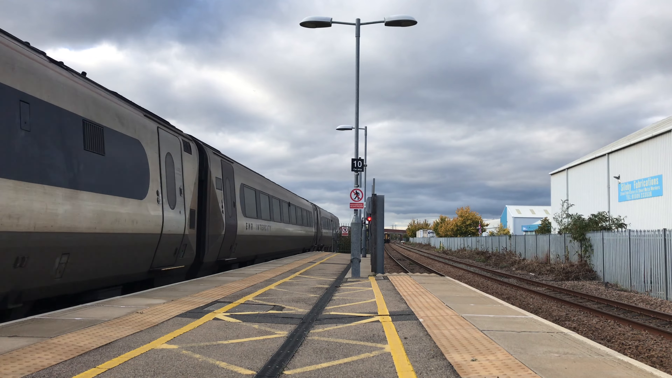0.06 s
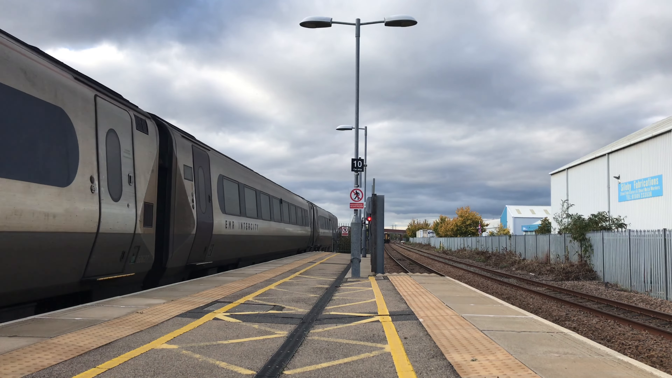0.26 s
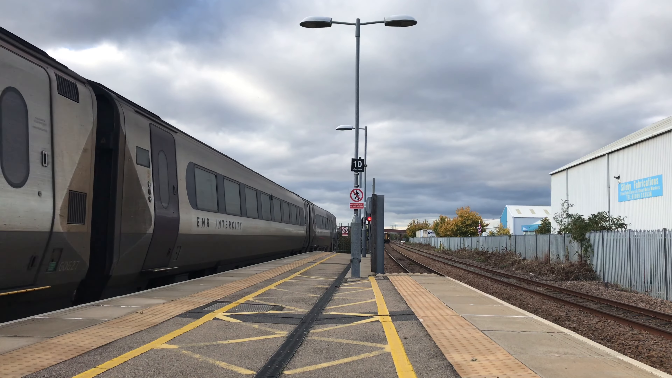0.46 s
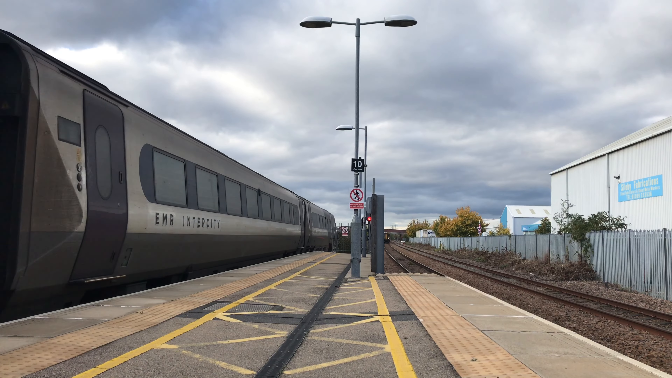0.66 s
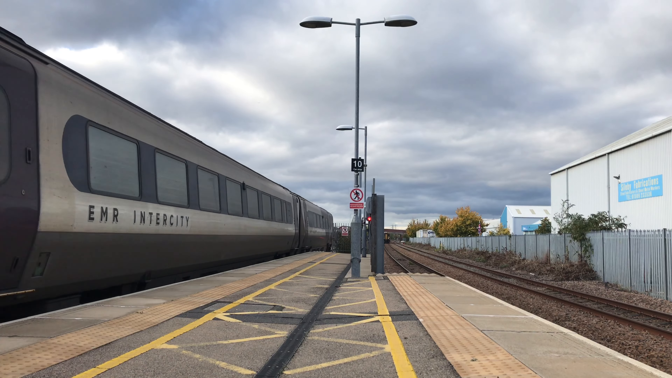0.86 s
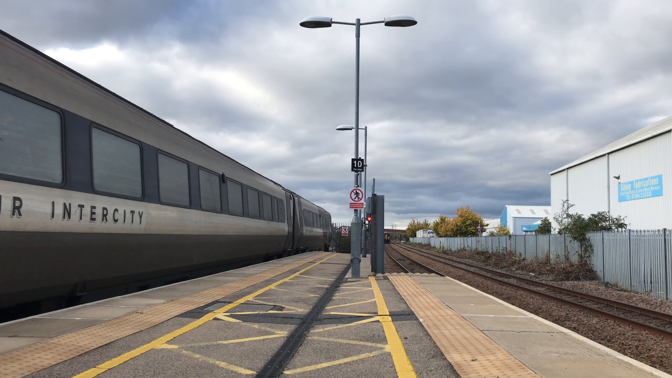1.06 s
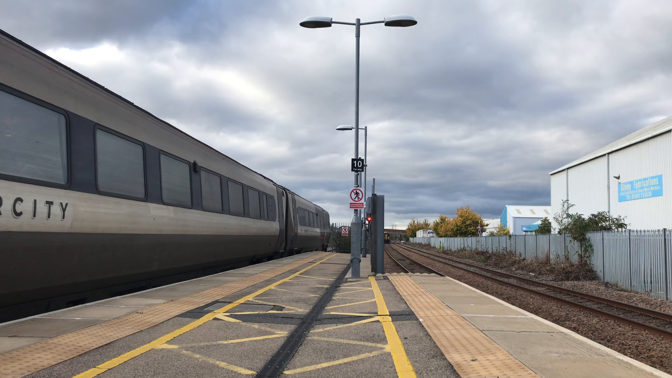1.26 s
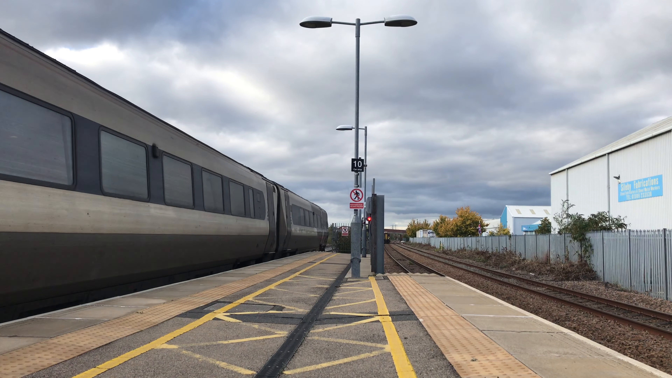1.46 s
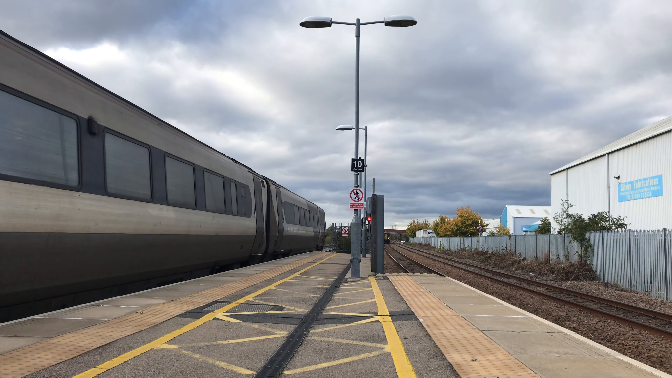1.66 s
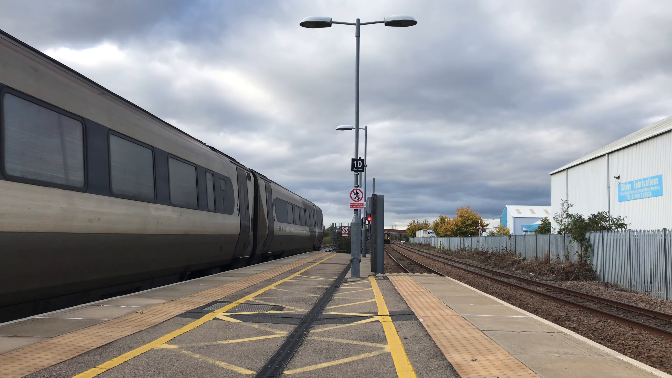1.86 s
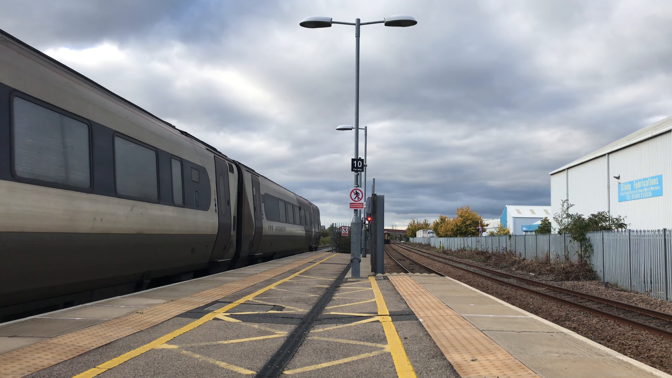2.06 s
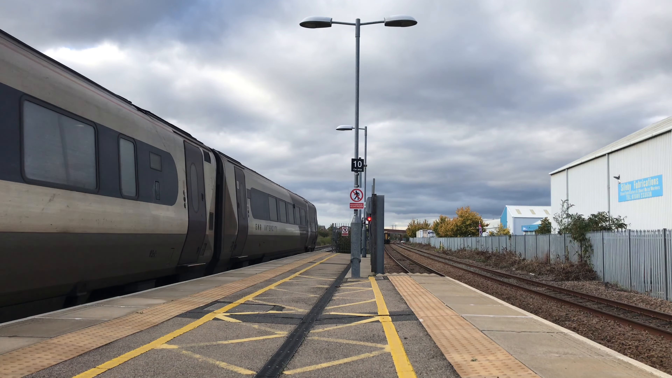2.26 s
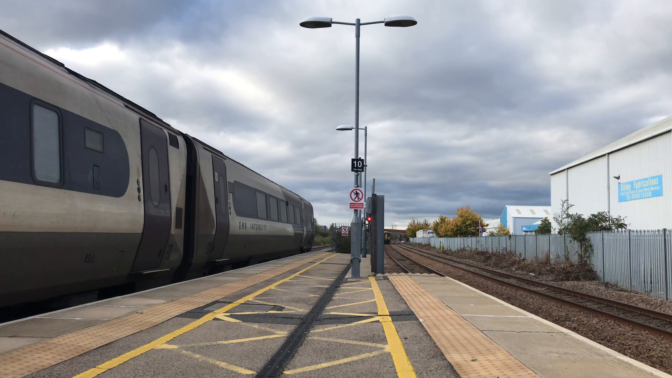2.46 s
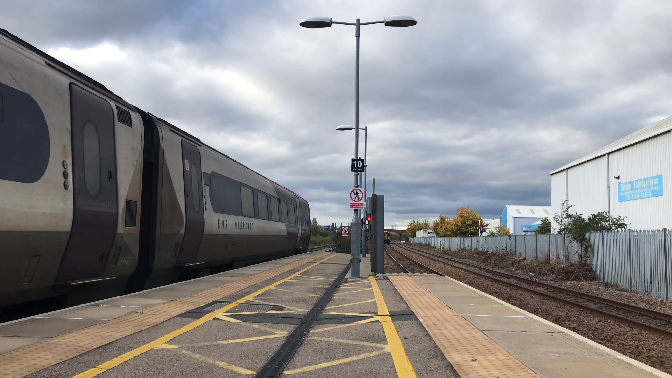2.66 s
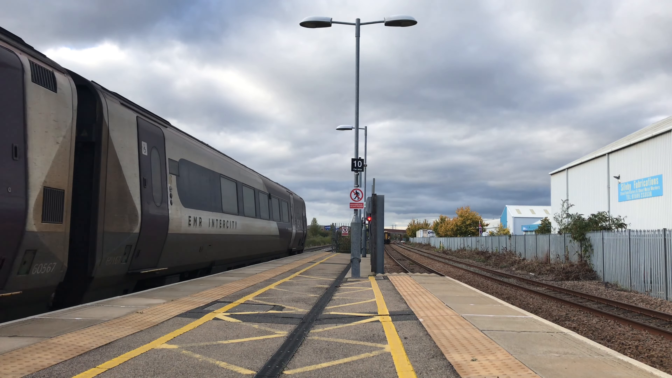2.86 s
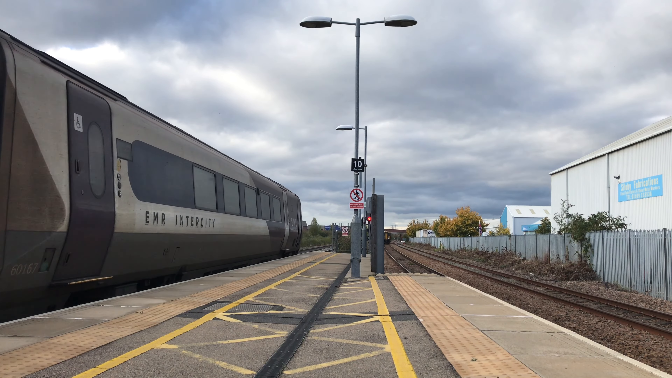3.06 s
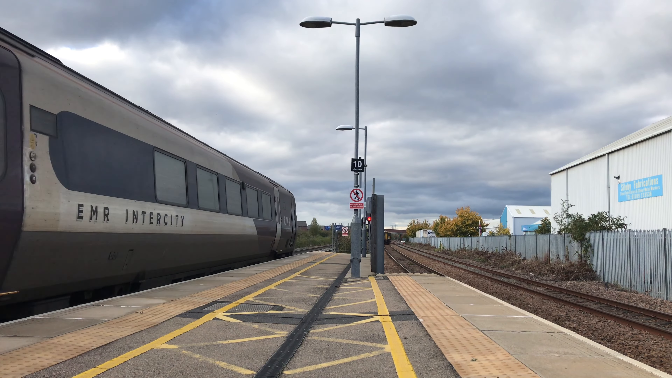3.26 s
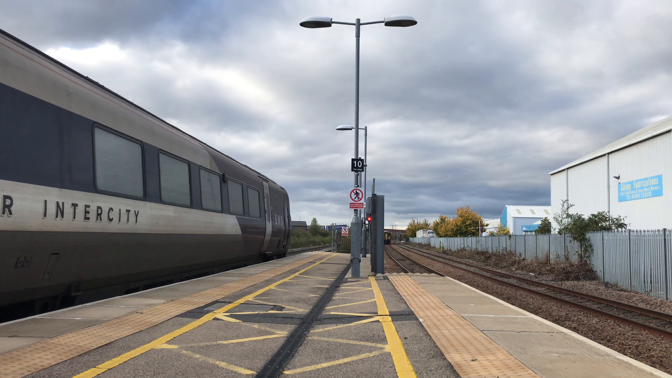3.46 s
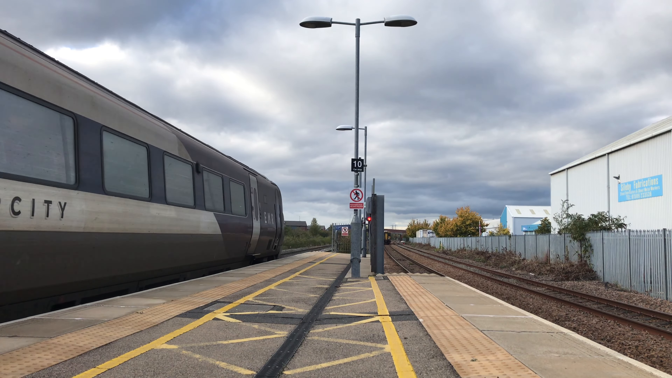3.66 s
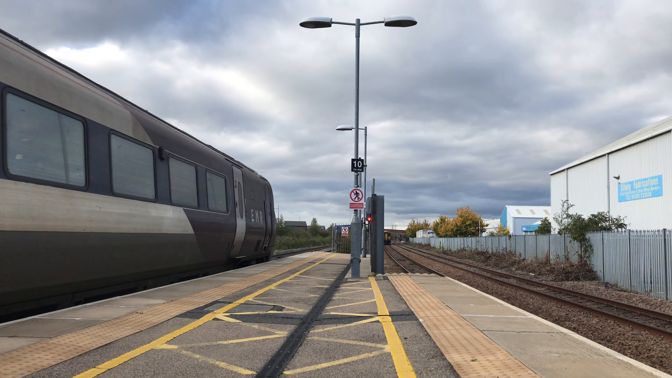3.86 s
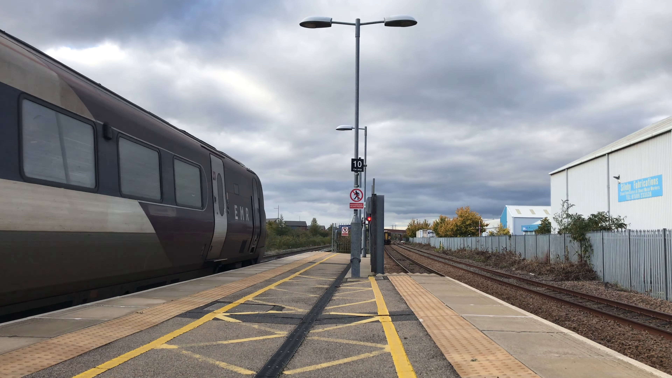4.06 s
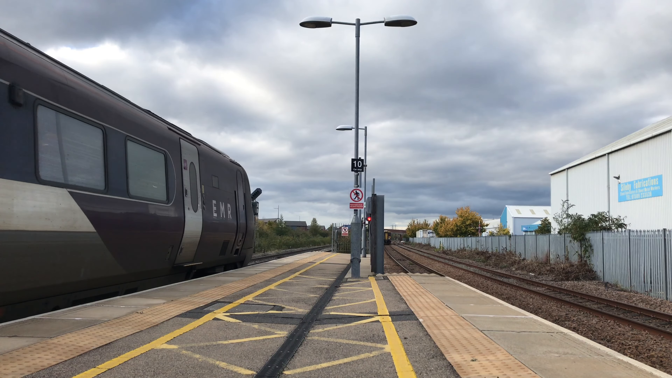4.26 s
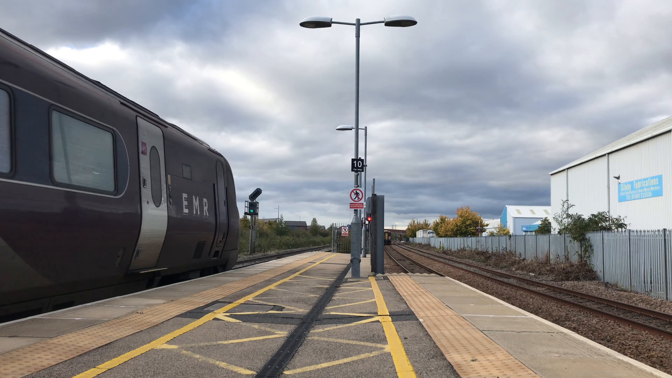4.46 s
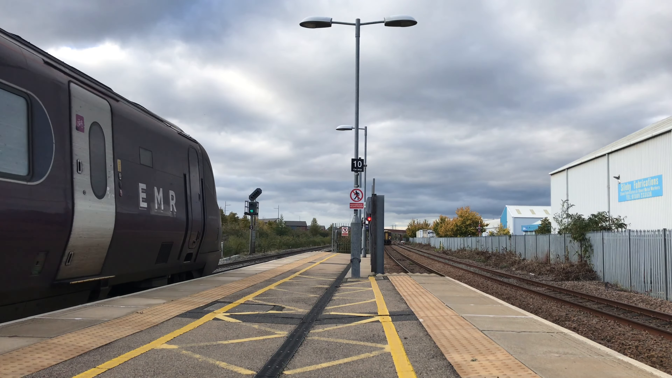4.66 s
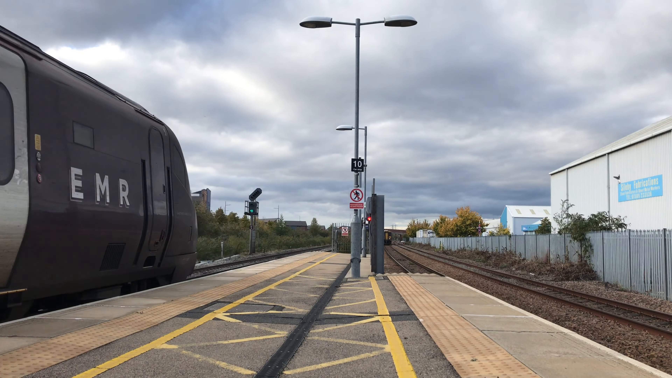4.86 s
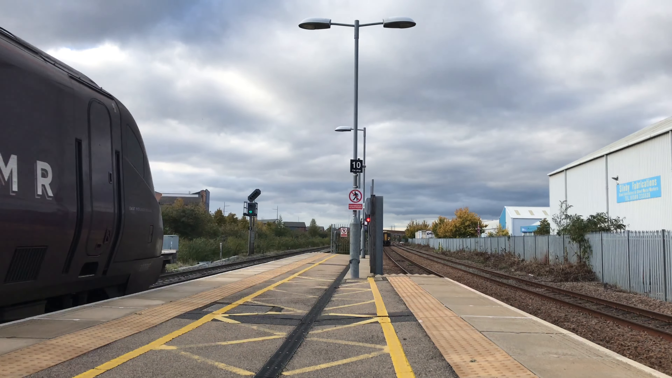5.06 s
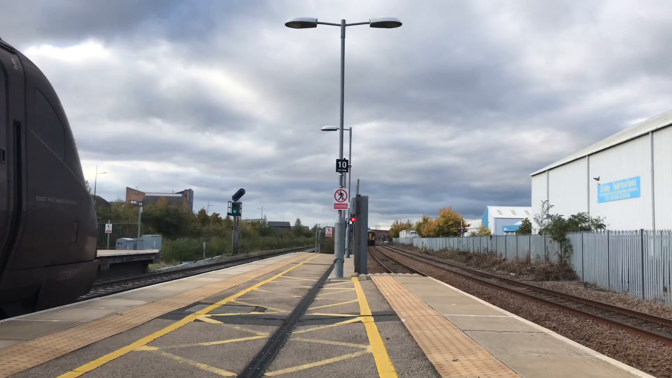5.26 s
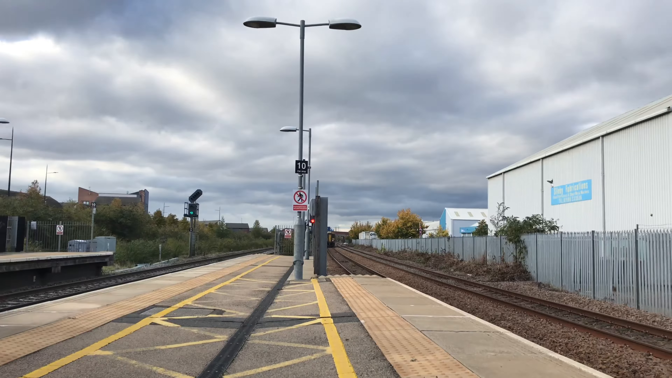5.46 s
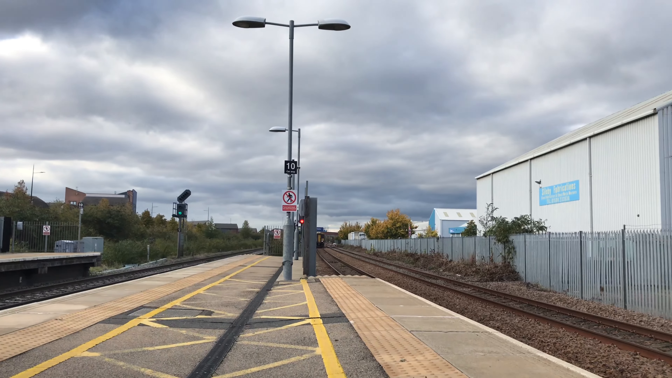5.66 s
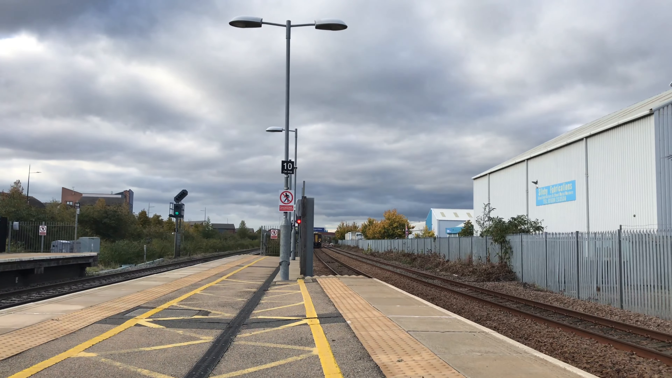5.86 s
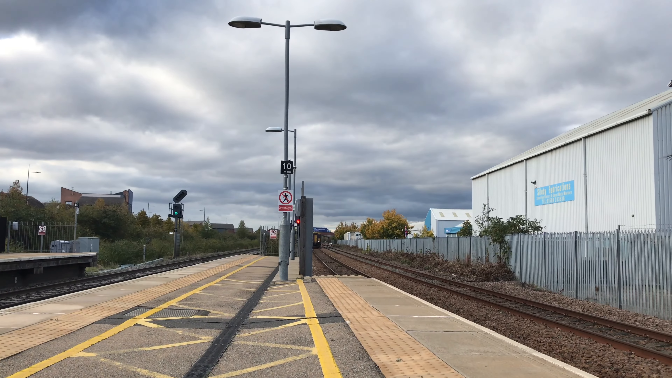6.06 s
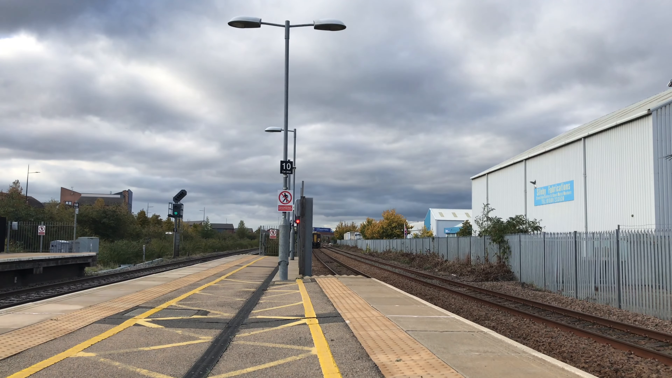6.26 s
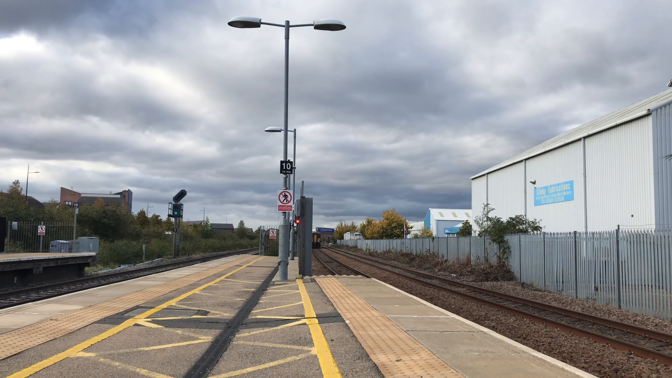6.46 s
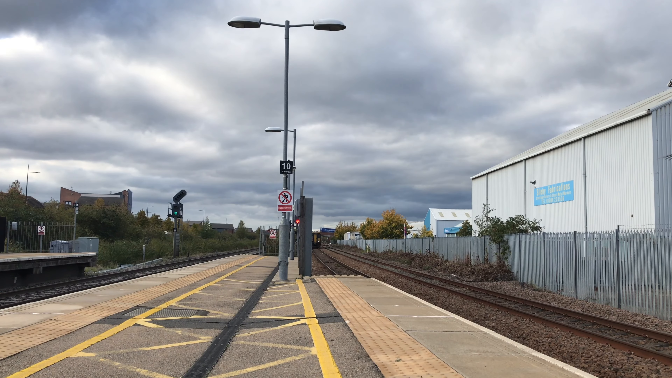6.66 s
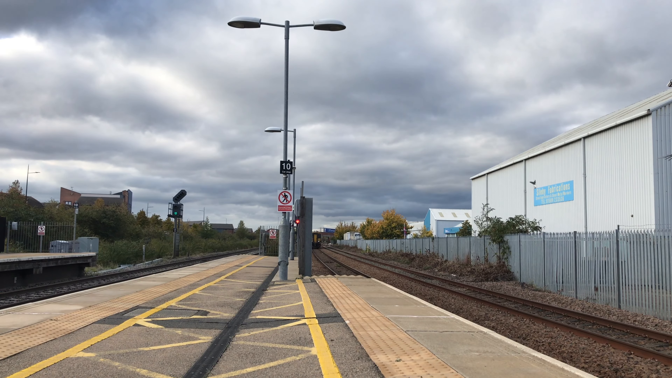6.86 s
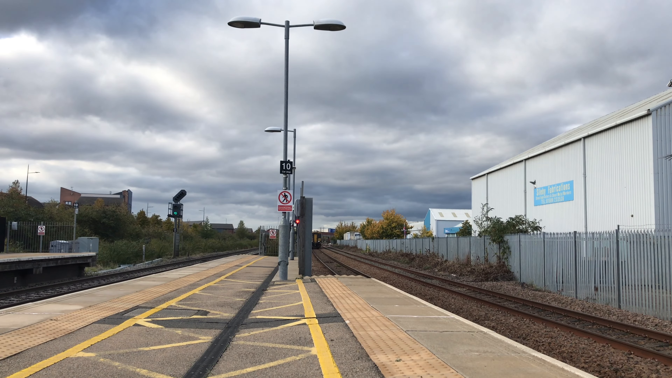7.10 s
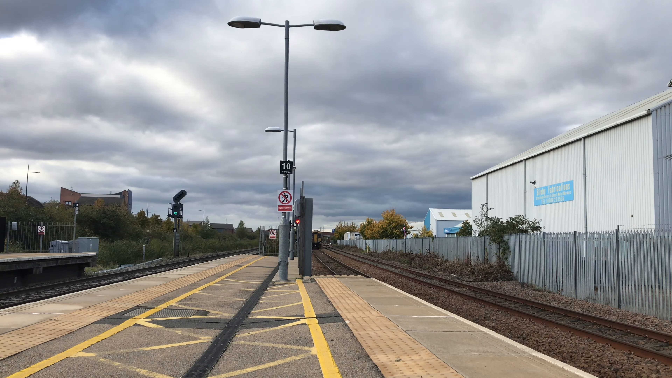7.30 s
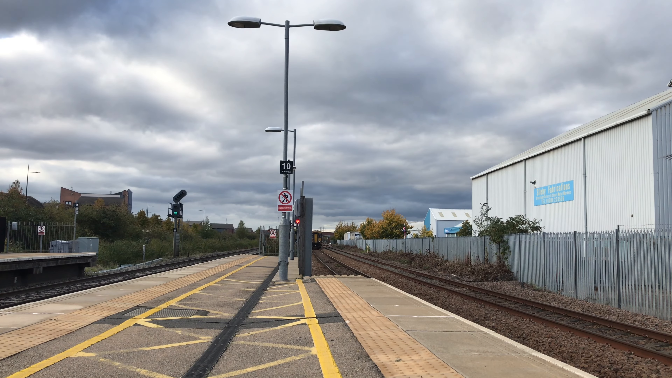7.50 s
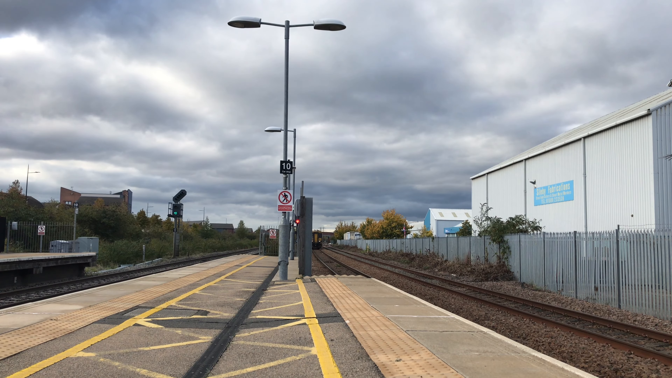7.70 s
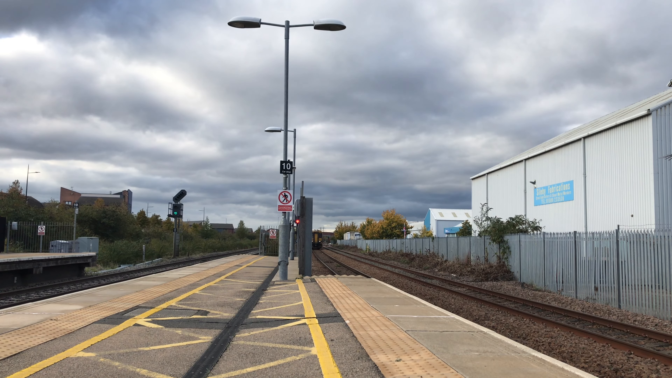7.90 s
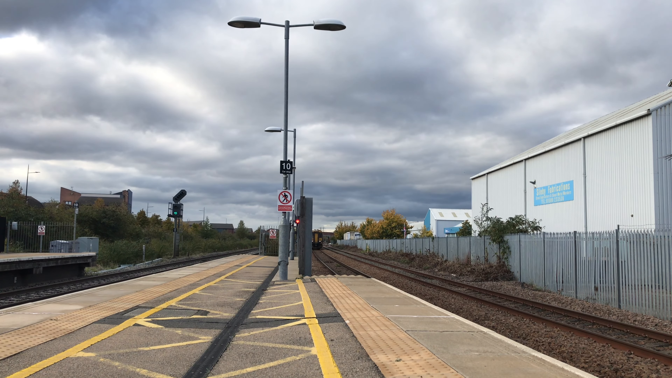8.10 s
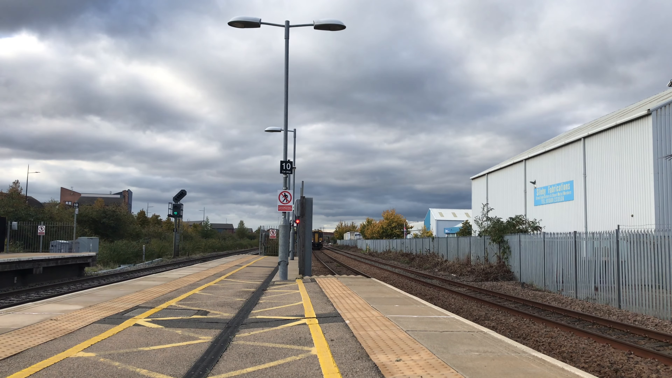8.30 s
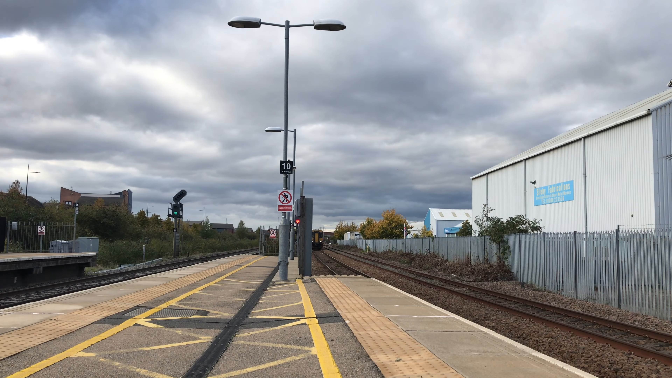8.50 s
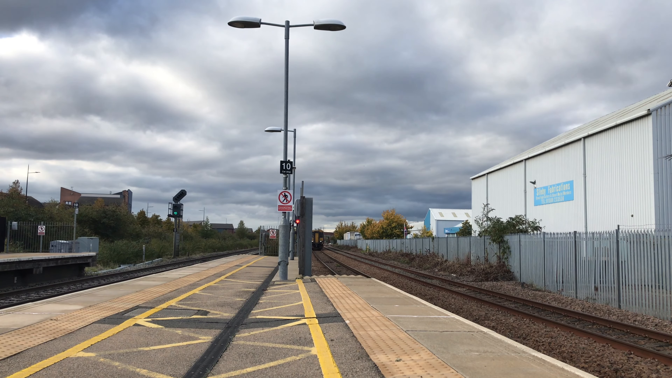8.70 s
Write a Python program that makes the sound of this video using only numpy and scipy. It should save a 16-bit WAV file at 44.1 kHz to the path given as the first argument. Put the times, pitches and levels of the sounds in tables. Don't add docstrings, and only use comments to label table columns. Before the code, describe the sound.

The sound begins at full strength, with a diesel train already rolling past a few metres from a microphone on an open station platform. A deep exhaust drone near 57 hertz throbs roughly ten times a second, over low rumble, block hum, broad wheel roar and thin hiss. An engine swells around 0.5 seconds; a sharp joint knock lands at 1.0 and a low thud at 1.65. The level eases near 1.5 to 2, then another car swells around 2.3 to 3. From about 3.7 to 4.8 the last cars are strong, with sinking metallic wheel tones and rougher clatter. Around 5.3 the tail clears and the treble drops away quickly. A thud and bright rail ticks come near 5.85, another tick at 6.8 and a small cluster at 7.8. Until about 8.7 a quieter, duller, unevenly beating engine hum and rolling noise recede.

```python
import sys
import numpy as np
from scipy import signal
from scipy.fft import rfft, irfft
from scipy.io import wavfile
from scipy.ndimage import uniform_filter1d

SR = 44100
rng = np.random.default_rng(int(sys.argv[2]) if len(sys.argv) > 2 else 0)


def boost(x):
    u = np.asarray(x, float) / 20
    return 10 ** u


def store_wav(level_fs):
    pcm = np.round(np.clip(np.atleast_2d(level_fs), -1, 1) * 32767)
    wavfile.write(sys.argv[1], SR, pcm.T.astype(np.int16))


N = 385413
SPEED = 9.6
CYCLE_HZ = 9.585
TAIL_S, TAIL_SPREAD_S = 5.3, .15


def evened(x):
    return x / np.sqrt(np.mean(x ** 2) + 1e-20)


def columns(rows, t):
    s, *values = np.transpose(rows)
    return [np.interp(t, s, v) for v in values]


def read(points, hz):
    f, value = np.transpose(points)
    return np.interp(np.log(hz + 1), np.log(f + 1), value)


def add(mix, s, sound):
    part = mix[round(s * SR):][:len(sound)]
    part += sound[:len(part)]


def drift(t, top_hz):
    waves = [np.sin(2 * np.pi * (f * t + rng.random())) / np.sqrt(f) for f in np.geomspace(top_hz / 10, top_hz, 12)]
    return evened(sum(waves))


def grain(shape, frames, bins):
    smooth_in_time = uniform_filter1d(rng.standard_normal(shape), frames, 0)
    return evened(uniform_filter1d(smooth_in_time, bins, 1)).T


def noise(field_db, size):
    a, b = rng.standard_normal((field_db.shape[1], field_db.shape[0], 2)).T
    gain = boost(field_db)
    x = signal.istft((a + 1j * b) * gain, nperseg=size, noverlap=size * 3 // 4)[1]
    return evened(x)[:N] * np.sqrt((gain ** 2).sum(axis=0).mean())


def follow(sources, t, level_db, share, lag_s, drop_db):
    power = 0
    for s, near, source_db in sources:
        distance = np.hypot(near, SPEED * (t - lag_s - s))
        power = power + (boost(source_db) * 5 / distance) ** 2
    drop = drop_db / (1 + np.exp((TAIL_S - t) / TAIL_SPREAD_S))
    return level_db + share * 10 * np.log10(power) + drop


def beats(rows, t):
    return sum(db * np.exp(-((t - s) / half) ** 2) for s, half, db in rows)


# abreast_s, distance_m, level_db
EXHAUSTS = [
    (-1.7, 5, 0),
    (.62, 5, 0),
    (3.05, 5, 0),
    (4.15, 5, -5),
]
# start_s, pitch_hz, level_db
FIRING = [(0, 58.6, -19), (.25, 58.2, -12.7), (.7, 57.1, -14.5), (1.3, 56.7, -18), (1.6, 58.8, -19),
          (2.0, 58.6, -21), (2.25, 58.0, -19), (2.55, 57.9, -15), (2.9, 57.8, -12.6), (3.4, 56.9, -16.5),
          (3.85, 56.9, -12), (4.2, 58.2, -16), (4.5, 56.3, -15.3), (4.9, 56.3, -16.5), (5.4, 56.1, -21),
          (6.25, 56.2, -20), (7.35, 56.3, -25), (8.5, 56.4, -24.3)]
# middle_s, half_length_s, level_db
CANCELS = [(.1, .04, -6), (.48, .1, -4), (1.06, .08, -4), (1.45, .07, -16), (1.85, .05, -3),
           (2.05, .05, -15), (2.37, .06, -8), (3.59, .09, -4), (4.23, .09, -8), (5.27, .08, -5),
           (6.0, .08, -2), (6.78, .08, -3), (7.13, .07, -3), (7.66, .2, -9)]
# middle_s, half_length_s, level_db
FOURTH_BEATS = [
    (1.72, .1, -11),
    (3.0, 0.33, 5),
    (4.25, .2, -8),
    (6.8, .15, -7),
    (7.5, .5, 8),
]
FIFTH_BEATS = [
    (.6, .15, 6),
    (1.37, .1, 7),
    (1.55, .08, -6),
    (2.55, 0.093, -3),
    (2.78, .1, -11),
    (4.1, 0.35, -10),
    (4.9, 0.29, -21),
    (5.2, .15, 6),
    (8.2, .5, 1),
]
SEVENTH_BEATS = [
    (.34, .07, -16),
    (2.75, 0.085, 0),
    (3.3, 0.14, -13),
    (3.9, 0.17, -13),
    (4.28, .12, -7),
]


def firing():
    t, s = np.arange(0, N / SR + .01, 1 / 441), np.arange(N) / SR
    hz, tone_db = columns(FIRING, t)
    fourth = follow(EXHAUSTS, t, -33, share=.9, lag_s=-.3, drop_db=-3) + beats(FOURTH_BEATS, t)
    fifth = follow(EXHAUSTS, t, -29.5, share=1.0, lag_s=-.2, drop_db=-2) + beats(FIFTH_BEATS, t)
    seventh = follow(EXHAUSTS, t, -32.5, share=.7, lag_s=-.2, drop_db=-7) + beats(SEVENTH_BEATS, t)
    sides = [db + 1.5 * drift(t, 4.4) for db in (fourth, fifth, seventh)]
    hz, main_db, *sides = columns(np.transpose([t, hz, tone_db + beats(CANCELS, t), *sides]), s)
    fired = 2 * np.pi * np.cumsum(hz) / SR
    weak_s, handover_s = .425, 1.65
    cycle = 2 * np.pi * CYCLE_HZ * (s - weak_s) + np.pi / 2 * (1 + np.tanh((s - handover_s) * 10))
    out = boost(main_db) * np.cos(fired)
    for k, db in zip((-2, -1, 1), sides):
        out = out - boost(db) * np.cos(fired + k * cycle)
    return np.sqrt(2) * out


def passing(sources, orders, spread, wobble_db):
    t = np.arange(0, N / SR + .01, 1 / 2205)
    out = 0
    for s, near, db in sources:
        distance = np.hypot(near, SPEED * (t - s))
        turn = 2 * np.pi * CYCLE_HZ * (t - distance / 343)
        level = boost(db) / distance ** spread
        for k, order_db in orders:
            waver = boost(order_db + wobble_db * drift(t, 2.5))
            out = out + level * waver * np.cos(round(k) * turn + 7 * rng.random())
    slow_power = uniform_filter1d(uniform_filter1d(out ** 2, 500), 500)
    steady = out / np.sqrt(slow_power)
    return signal.resample_poly(steady * boost(wobble_db / 2 * drift(t, 5)), 20, 1)[:N]


# abreast_s, distance_m, level_db
BLOCKS = [
    (-2.1, 4, -3),
    (.2, 4, 1),
    (2.4, 4, 0),
    (4.65, 4, -1),
]
# abreast_s, distance_m, level_db
CASINGS = [
    (-3.47, 12, 0),
    (-.05, 2.3, -6.2),
    (2.18, 2.8, -3.4),
    (4.23, 2, -1.9),
    (4.58, 1.7, -8),
    (5.53, 2.1, -9),
]
# multiple, level_db
HARMONIC = [(12, 0)]
EXHAUST_ORDERS = [(10, -13), (13, -13), (14, 0)]
BLOCK_ORDERS = [(9, -5), (16, -5), (17, -7), (18, 0), (19, -10), (20, -11), (22, -12)]
# middle_s, half_length_s, level_db
HARMONIC_BEATS = [
    (.2, 0.35, -3.5),
    (3.55, 0.073, 4.5),
    (3.93, .08, -7),
    (4.13, .08, 2),
    (4.4, .12, -9),
    (4.8, 0.093, 4.5),
    (5.1, 0.19, -10),
    (5.6, 0.17, -4),
    (7.65, 0.23, -11),
]
PIPE_BEATS = [
    (2.95, .12, -16),
    (3.5, .1, -8),
    (4.15, .12, -7),
    (4.5, .15, -2),
    (7.7, 0.49, 8),
]
BLOCK_BEATS = [
    (3.95, .15, -3.5),
    (4.9, 0.46, -4),
    (8.5, .4, -6),
]
# pitch_hz, level_db (per Hz)
RUMBLE = [(15, -50), (30, -22), (45, -11), (80, -2), (103, -11.5), (130, -6.5), (190, -2.5), (260, -40)]


def engines():
    t = np.arange(0, N / SR + .01, 1 / 441)
    levels = [follow(EXHAUSTS, t, -26.5, share=-.08, lag_s=-.5, drop_db=-10.5) + beats(HARMONIC_BEATS, t),
              follow(EXHAUSTS, t, -28.5, share=.37, lag_s=-1.1, drop_db=-5.5) + beats(PIPE_BEATS, t),
              follow(CASINGS, t, -30.8, share=.45, lag_s=.2, drop_db=-5) + beats(BLOCK_BEATS, t),
              follow(CASINGS, t, -33, share=.5, lag_s=.15, drop_db=-1)]
    harmonic_db, pipe_db, block_db, rumble_db = columns(np.transpose([t, *levels]), np.arange(N) / SR)
    harmonic = boost(harmonic_db) * passing(EXHAUSTS, HARMONIC, spread=.5, wobble_db=2.2)
    pipes = boost(pipe_db) * passing(EXHAUSTS, EXHAUST_ORDERS, spread=.5, wobble_db=2.2)
    blocks = boost(block_db) * passing(BLOCKS, BLOCK_ORDERS, spread=.85, wobble_db=2)
    hz = np.fft.rfftfreq(4096, 1 / SR)
    rumble_colour = read(RUMBLE, hz) - (hz > 300) * 60
    rumble = evened(noise(rumble_colour[:, None] + np.zeros(N // 1024 + 6), size=4096))
    return harmonic + pipes + blocks + rumble * boost(rumble_db)


# low_hz, high_hz
ROAR_BANDS = [(200, 420), (550, 1900), (2400, 6000), (8000, 15000)]
# pitch_hz, level_db (per Hz)
ROAR_COLOUR = [(110, -32), (190, 0), (318, -3.5), (420, -8.5), (815, -11), (1140, -12.5), (1700, -16.5),
               (2050, -20.5), (3020, -22.5), (3690, -25.5), (5440, -34), (8630, -38.5), (10600, -44),
               (13700, -44), (15600, -47)]
# pitch_hz, width_hz, level_db
RINGS = [(312, 21, 1), (444, 110, -1.5), (848, 44, 3.5), (1004, 120, 2), (1667, 215, 5), (2610, 98, -3.5),
         (3080, 125, 1.5), (3650, 480, -2), (4980, 240, -3), (5360, 190, 4.5), (7720, 290, -5),
         (8500, 350, -1), (10530, 390, -7.5)]


def roar():
    hz, t = np.fft.rfftfreq(1024, 1 / SR), np.arange(N // 256 + 6) * 256 / SR
    colour = read(ROAR_COLOUR, hz) - (hz < 170) * 40
    colour = colour + sum(db / (1 + (2 * (hz - f) / w) ** 2) for f, w, db in RINGS)
    boom = follow(CASINGS, t, -34, share=.36, lag_s=.02, drop_db=-5)
    wheel_roar = follow(CASINGS, t, -32, share=.52, lag_s=.19, drop_db=-7.2)
    clatter = follow(CASINGS, t, -41.8, share=.57, lag_s=.11, drop_db=-6.4)
    hiss = follow(CASINGS, t, -51.6, share=.75, lag_s=.04, drop_db=-10)
    lifts = []
    for db, (low_hz, high_hz) in zip((boom, wheel_roar, clatter, hiss), ROAR_BANDS):
        inside = (hz >= low_hz) & (hz < high_hz)
        lifts.append(db - 10 * np.log10((boost(colour[inside]) ** 2).sum()))
    centres = np.log(np.prod(ROAR_BANDS, axis=1)) / 2
    shares = np.array([np.interp(np.log(hz + 1), centres, row) for row in np.eye(len(centres))])
    shape, pitch = (len(t), len(hz)), hz[:, None]
    near = np.clip((hiss + 92) / 40, .3, 1)
    patches = 2.38 * near * grain(shape, 40, 4) / (1 + pitch / 2500)
    bursts = 1.3 * near * grain(shape, 9, 16) / (1 + pitch / 5000)
    sweeps = 1.7 * near * grain(shape, 35, 14) * np.clip(pitch / 5000, 0, 1)
    shaking = evened(uniform_filter1d(rng.standard_normal(len(t)), 8))
    rattle = .71 * shaking * np.clip(pitch / 6000, 0, 1)
    return noise(colour[:, None] + shares.T @ lifts + patches + bursts + rattle + sweeps, size=1024)


# start_s, end_s, middle_hz, level_db
STRANDS = [(0, .9, 818, -41.4), (4.35, 4.8, 808, -41), (.3, 1.7, 1005, -45.9), (3, 4.2, 988, -44),
           (4.7, 5.5, 938, -46.6), (1.2, 1.9, 328, -36.8), (1.85, 2.6, 325, -35.5), (3.7, 4.5, 308, -35.2),
           (4.45, 5.2, 295, -38.8), (3.95, 4.35, 242, -32.6), (4.45, 5, 225, -33.6), (5.3, 5.9, 598, -48.9),
           (.4, .9, 1590, -46), (3.7, 4.8, 1740, -41.5), (2.1, 2.9, 3020, -50.5), (3.4, 4.9, 3000, -49.5),
           (.15, .8, 5440, -57), (2.45, 3.1, 5455, -58.8), (4.9, 5.65, 5465, -54), (5.7, 7.6, 5310, -72.9),
           (7.3, 9.2, 7150, -76), (2.8, 3.4, 14100, -66.1), (4.5, 5.2, 9600, -58.9), (1, 1.5, 8325, -67),
           (5.1, 5.6, 8150, -64)]
# start_s, end_s, middle_hz, level_db, width_hz
SURGES = [(4.15, 4.75, 4350, -43.5, 500), (0, .5, 710, -39, 220), (2.17, 2.48, 826, -35, 14),
          (4.05, 4.3, 1705, -40, 100), (2.4, 3.15, 806, -38.5, 14), (0, .95, 2745, -50.5, 45),
          (4.8, 6.15, 280, -35, 110), (.7, 1.3, 320, -40, 60), (3.45, 4.4, 285, -34, 80),
          (2.65, 3.5, 330, -38, 80), (0, .7, 175, -32, 12), (1.05, 1.6, 135, -31, 8),
          (0, .45, 1600, -41, 300), (3.75, 4.2, 1050, -40, 200), (2.25, 2.7, 660, -39, 120)]


def strands():
    out = np.zeros(N)
    thin = [(*row, 8 + .03 * row[2]) for row in STRANDS]
    for start, end, hz, db, width_hz in thin + SURGES:
        sink = .031 * min(end - start, 1) / 2 * (start < TAIL_S)
        size = round((end - start) * SR)
        r = np.exp(-1.2 * np.pi * width_hz / SR)
        a, b = signal.sosfilt([1, 0, 0, 1, -2 * r, r * r], rng.standard_normal((2, 2 * SR)))[:, -size:]
        turn = 2 * np.pi * np.cumsum(np.linspace(hz * (1 + sink), hz * (1 - sink), size)) / SR
        tone = (evened(a) + 32 / width_hz) * np.cos(turn) + evened(b) * np.sin(turn)
        flutter = boost(2.5 * drift(np.arange(size) / SR, 14))
        swell = signal.windows.tukey(size, min(.6 + width_hz / 500, 1))
        if start == 0:
            swell[:size // 2] = 1
        add(out, start, boost(db + .5 - width_hz / 300) * evened(tone * flutter) * swell)
    return out


# start_s, peak_db, centre_hz, fade_s (to -60
# dB), width_octaves
TICKS = [(.086, -36, 12500, .07, 1.1), (.69, -50, 9000, .04, .8), (.82, -52, 14000, .03, .5),
         (.915, -50, 10000, .05, .9), (1.02, -54, 13000, .05, .6), (1.44, -50, 9000, .05, .9),
         (3.992, -44, 14000, .02, .4), (5.308, -43, 5800, .09, 0.57), (5.583, -45, 4500, .06, .5),
         (5.683, -56, 12000, .04, .3), (5.7, -60, 10000, .15, .1), (5.854, -39, 4570, .12, 0.68),
         (5.856, -40, 2500, 0.082, 0.9), (6.135, -54, 7000, .08, .4), (6.22, -64, 13000, .02, .5),
         (6.79, -39, 3900, .025, 0.3), (7.761, -46, 3500, .02, 1.2), (7.7695, -48, 8500, .012, .6),
         (7.7705, -37, 2600, 0.018, 1.0), (7.7825, -44, 3600, .025, 1.1), (7.792, -48, 3300, .04, 0.7),
         (7.8, -57, 3500, .03, 1.3), (7.764, -63, 12000, .25, .5), (8.7365, -50, 10000, .03, 1.3),
         (1.0232, -24, 2500, .02, 1.0),
    (1.0235, -22, 1200, .03, .5),
]
# start_s, peak_db, pitch_hz, fade_s (to -60 dB)
THUDS = [
    (1.649, -14, 200, .045),
    (5.851, -15, 205, .07),
]


def knocks():
    out, t, hz = np.zeros(N), np.arange(4096) / SR, np.fft.rfftfreq(4096, 1 / SR)
    for s, db, centre_hz, fade_s, octaves in TICKS:
        band = np.exp(-(np.log2((hz + 1) / centre_hz) / octaves) ** 2)
        burst = evened(irfft(rfft(rng.standard_normal(4096)) * band))
        add(out, s, boost(db - 60 * t / max(fade_s, .005)) * burst * np.minimum(t / .0019, 1))
    for s, db, pitch_hz, fade_s in THUDS:
        ring = -np.sin(2 * np.pi * pitch_hz * t)
        add(out, s, boost(db - 60 * t / fade_s) * ring * np.minimum(t / .0017, 1))
    return out


def scene():
    return (firing() + engines() + roar() + strands() + knocks())[None]


def low_pass(x):
    return signal.sosfilt(signal.butter(12, 15710, fs=SR, output="sos"), x)


def record(dry):
    return low_pass(dry)


dry = scene()
out = record(dry)
store_wav(out)
```